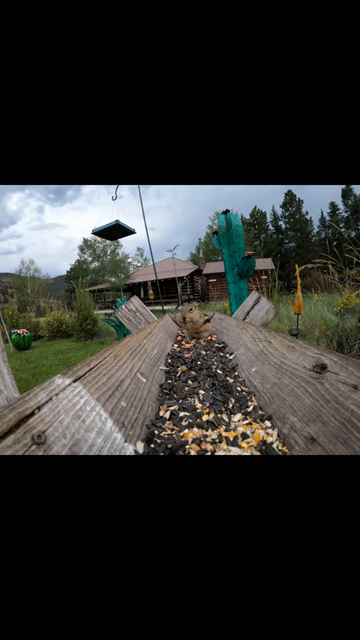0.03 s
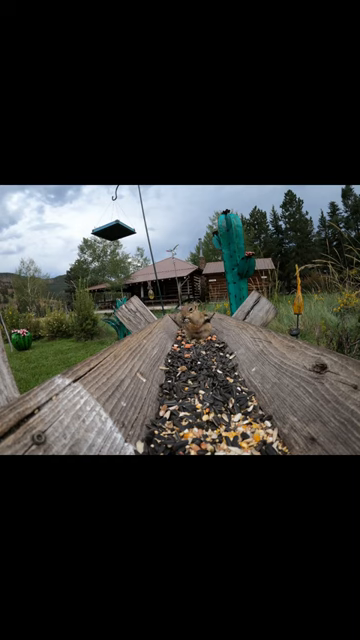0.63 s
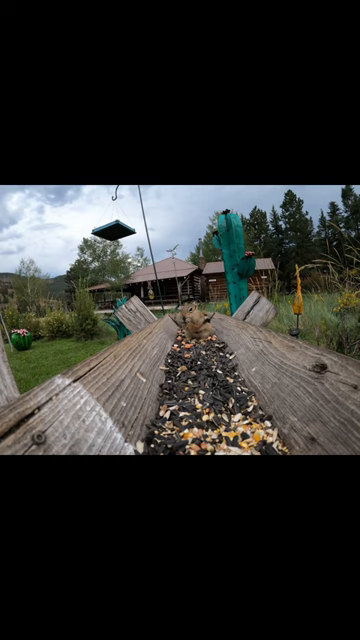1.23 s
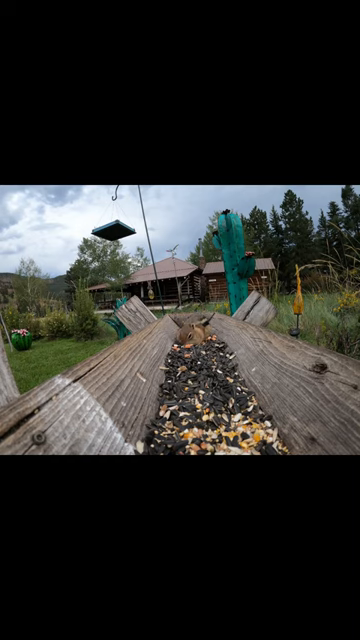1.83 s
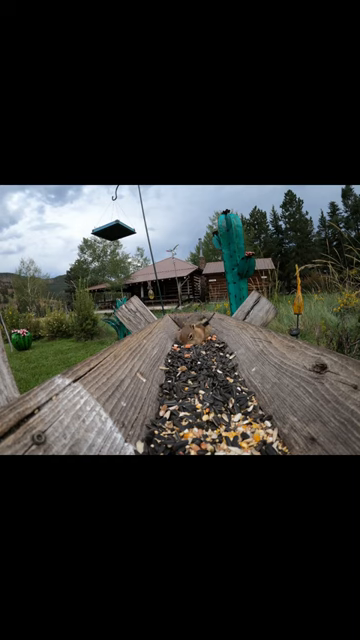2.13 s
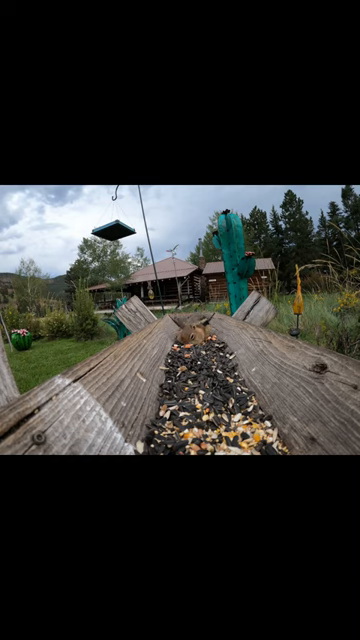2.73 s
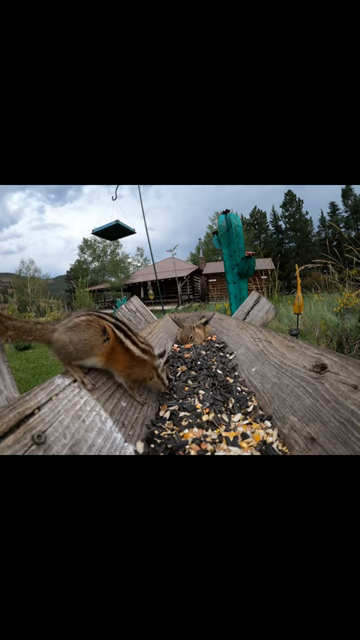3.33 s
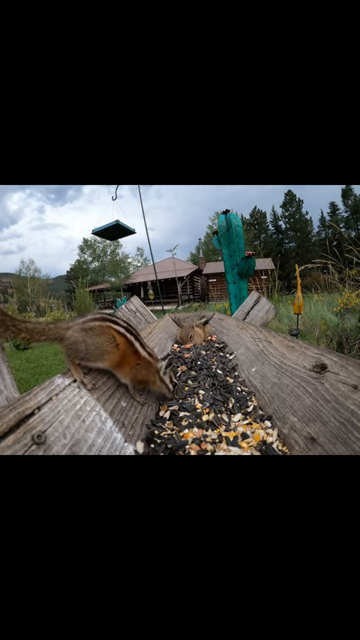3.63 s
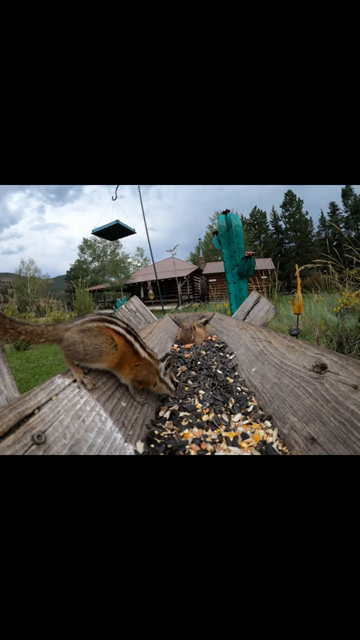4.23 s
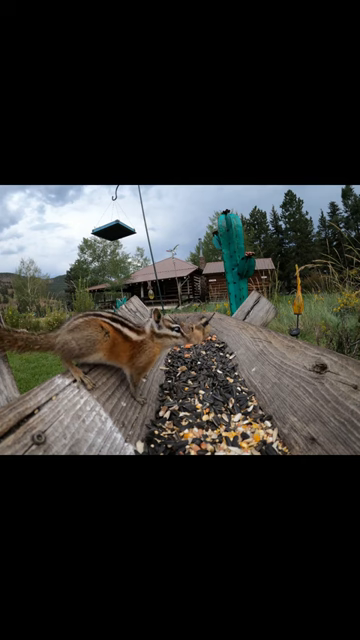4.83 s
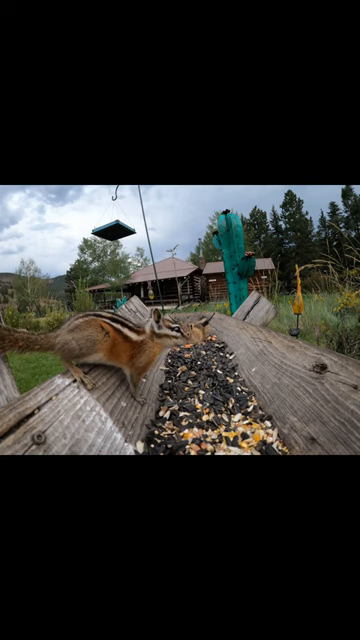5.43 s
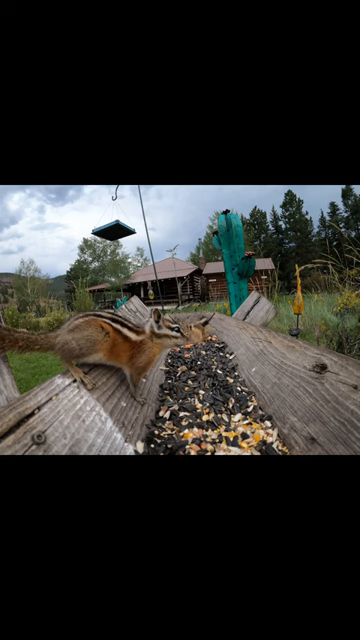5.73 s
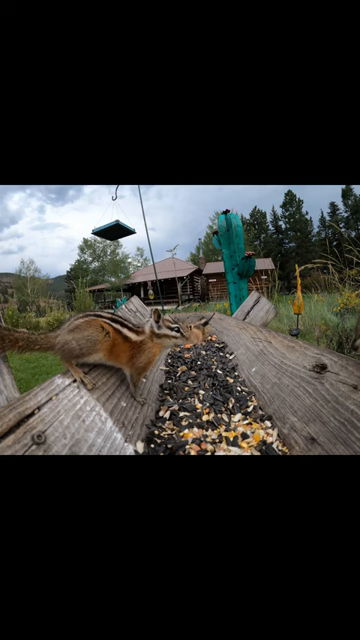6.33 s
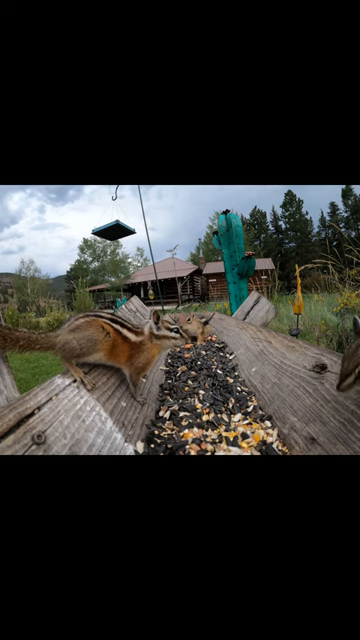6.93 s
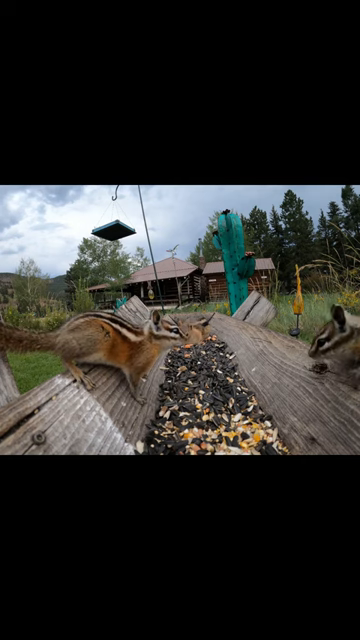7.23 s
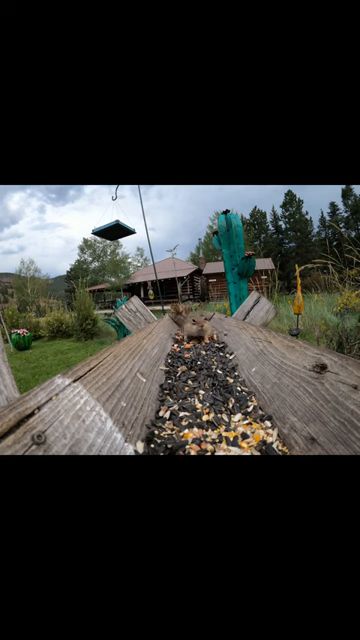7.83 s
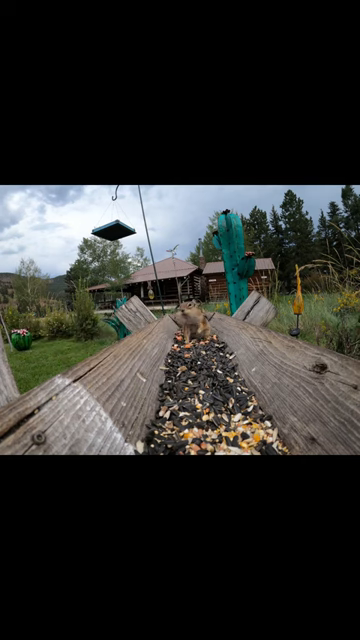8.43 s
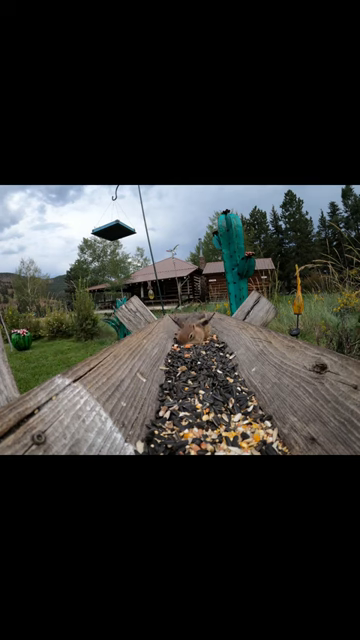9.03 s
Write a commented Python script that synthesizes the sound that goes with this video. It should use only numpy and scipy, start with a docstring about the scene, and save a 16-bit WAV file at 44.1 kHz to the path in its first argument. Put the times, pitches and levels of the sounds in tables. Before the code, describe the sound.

Chipmunks forage on a wooden feeder close to the microphone, over a faint outdoor rush and low wavering drone. Dry husks rustle and snap through the first two seconds while a distant bird trills. A nearby bird repeats a high two-part chirp about twice a second until around 7 seconds. At 0.7 seconds, and again from 2.6 to 3, claws and paws dash over the planks with hollow taps and soft thumps. Far whistles come between 2.4 and 4.5 seconds. From 3.5 seconds shells crack and tiny teeth click, with a few paw thumps just after 5, then soft chewing until 6.3. Short high chips answer the bird from 6.7. From 7.6 to 8.3 seconds comes the loudest part, a scuffle of clattering claws, knocks, low bumps and scattering seeds. A few chips and light taps finish it by 9 seconds.

```python
"""Chipmunks forage in a wooden trough of sunflower seeds, beside a camera resting on the boards.
From the start husks rustle and snap over a distant rush, a low drone and a far trill; a near bird
repeats a two-humped chirp. Before the first second is out, and again near the third, a dash sets the
planks ringing under claws and paws. Birds whistle further off, teeth crack shells, an animal chews,
and short chips answer the chirp. Near the end two chipmunks scuffle and bolt."""
import sys
import numpy as np
from scipy import signal
from scipy.fft import rfft, irfft
from scipy.io import wavfile
from scipy.ndimage import uniform_filter1d

SR = 44100
rng = np.random.default_rng(int(sys.argv[2]) if len(sys.argv) > 2 else 0)


def wav_out(sig):
    """Save sig, one row per channel (or a flat mono array), as 16-bit PCM at SR to the path in sys.argv[1]."""
    wavfile.write(sys.argv[1], SR, np.round(np.clip(np.atleast_2d(sig).T, -1, 1) * 32767).astype(np.int16))


N = 401310
TIME = np.arange(N) / SR

# Resonances of the feeder. Each row: frequency in Hz, bandwidth in Hz, gain in dB when struck at the
# far end, gain in dB when struck on the rim.
PLANK_MODES = [(710, 35, -9.5, 11), (775, 83, 6.5, -33), (941, 74, 12.5, -2.5), (989, 88, 9, 7),
               (1140, 120, 0.5, 6.5), (1302, 72, -2, 9.5), (1527, 39, -6, -19), (1566, 96, -42, 8.5),
               (2040, 13, -26, 12), (2750, 67, -23, -1), (3410, 126, -3, 3), (3650, 156, 0.5, -9),
               (4470, 160, -17.5, 0), (4800, 190, -13, -4.5), (6700, 99, -8, -23)]
# Low modes of the boards. Each row: frequency in Hz, 60 dB decay time in seconds, left minus right in dB.
BOARD_MODES = [(139.6, 0.15, -2), (195.5, 0.27, -3.5), (236.7, 0.15, -14), (334.1, 0.17, -30),
               (342.6, 0.23, -4)]
# Path of the busiest animal. Each row: time in seconds, place from 0 (far end) to 1 (near rim).
PLACE = [(0, 0.033), (3.0, 0.1), (3.4, 0.66), (7.5, 0.33), (7.86, 0.67), (7.95, 0.47), (9.1, 0.39)]
# Spectra of the noises. Each row: frequency in Hz, gain in dB.
SWAY_SPECTRUM = [(10, -7), (27, 5.5), (40, 0.5), (60, -1.5), (90, -11.5), (200, -40), (500, -81)]
RUSH_SPECTRUM = [(40, 10.5), (90, 7.5), (150, 8.5), (220, 4.5), (270, -3), (520, -9), (750, -6),
                 (1000, -1.5), (1300, 1), (2100, -12), (3000, -20.5), (4500, -26.5), (8000, -32.5),
                 (16000, -43)]
HUSK_SPECTRUM = [(800, -7), (1200, 10.5), (2000, 10.5), (3500, 0), (6000, 0), (8000, -9.5), (10000, -11.5),
                 (13000, -18), (16000, -25)]
CLAW_SPECTRUM = [(300, 6.5), (700, -3.5), (3000, -10), (7000, -12), (10000, -19.5), (13000, -16.5),
                 (16000, -30)]
BOARD_SPECTRUM = [(60, -19.5), (130, 11), (220, 17.5), (280, 8.5), (340, 13.5), (450, 5.5), (560, -7),
                  (700, -10), (850, -41)]
SEED_SPECTRUM = [(1200, -3.5), (1800, 1.5), (3500, 0), (6500, -3.5), (9000, -7), (12500, -14.5),
                 (14500, -17), (16000, -44.5)]
# A breeze rocking the feeder. Each row: time in seconds, level in dB.
BREEZE = [(0, -81), (1.3, -62.5), (1.8, -51.5), (2.2, -72), (3.1, -60.5), (4.5, -62), (5.4, -56),
          (6.2, -71.5), (9.1, -69)]
# A far drone. Each row: time in seconds, centre frequency in Hz, level in dB.
DRONE = [(0, 149.6, -70.5), (.9, 144.5, -62.5), (1.45, 195.2, -62.5), (1.65, 130.8, -59.5),
         (1.85, 87.45, -51), (2.17, 81.9, -55), (2.55, 98.3, -49), (3.25, 88, -53.5), (3.6, 71.4, -62),
         (4.4, 75.3, -50), (4.8, 86.1, -57.5), (5.1, 150, -56), (5.6, 145, -62), (6.2, 90.1, -74.5),
         (7.3, 108.6, -67.5), (9.1, 79.4, -72)]
# A distant rush with a hum in it. Each row: time in seconds, rush level in dB, hum level in dB.
RUSH = [(0, -61, -69), (2.1, -60, -64), (3.3, -62.5, -73), (4.5, -62, -71), (5.3, -61, -68),
        (6.1, -62, -63), (7.4, -60, -66.5), (8.5, -63.5, -69.5), (9.1, -60.5, -81.5)]
# Trill phrases. Each row: start, length and first note spacing in seconds, relative level in dB,
# pitch factor.
TRILLS = [(-.025, 1.26, .111, -59, 1.09), (1.487, .47, .134, -64, .99)]
# Contours of single bird notes. Each row: time from the onset in seconds, frequency in Hz, gain in dB.
TRILL_SHAPE = [(0, 2340, 9), (.015, 2650, 1), (.028, 3010, 10), (.04, 3960, -0.5), (.055, 4100, -54)]
CHIRP_SHAPE = [(0, 4100, -24), (.007, 4400, -14.5), (.016, 4490, -5.5), (.026, 4280, -7.5),
               (.034, 3900, -19), (.040, 4350, -14), (.05, 4500, -4), (.06, 4260, -4.5), (.068, 3850, -5.5),
               (.076, 3300, -8)]
CHIP_SHAPE = [(0, 3170, -17), (.008, 3470, -8.5), (.018, 4250, -9), (.028, 4330, -8), (.038, 3950, -17),
              (.046, 3820, 1)]
# Bouts of nosing among husks. Each row: start in seconds, length in seconds, relative level in dB.
RUMMAGES = [(0, 0.92, -86), (1.707, 0.17, -77.5), (2.24, 0.099, -84), (3.284, 0.026, -76),
            (3.433, 0.043, -70), (3.946, .08, -74), (4.18, 0.15, -81.5), (4.553, 0.096, -78.5),
            (5.09, 0.069, -75), (5.279, 0.031, -77), (5.72, 0.33, -114), (6.117, 0.061, -82),
            (6.428, 0.16, -77.5), (6.81, 0.04, -72), (7.145, 0.015, -72), (7.497, 0.026, -74.5),
            (8.252, 0.23, -91), (9.0, 0.02, -69.5)]
# Husks splitting. Each row: start and decay time in seconds, levels of the low band, the crack and the
# bright edge in dB, top of the edge in Hz.
SNAPS = [(0.0888, 0.00053, -74, -62, -61, 15000), (0.1162, 0.0014, -50.5, -50.5, -48, 12000),
         (.598, 0.00068, -53, -58, -48.5, 14800), (0.634, 0.00055, -62, -68, -53, 14000),
         (.858, 0.001, -74, -75, -55, 13700), (1.096, 0.00062, -72, -79, -60, 14840),
         (1.106, .002, -65, -75, -66, 10000), (1.1455, 0.0054, -57, -55, -50.5, 9000),
         (1.235, .002, -76, -67, -68, 12100), (1.302, .003, -77, -74, -65, 12900),
         (1.357, 0.00092, -72, -58, -69, 14140), (1.572, 0.0066, -65, -66, -60.5, 7940),
         (1.639, 0.00077, -70, -60, -57, 14000), (1.708, 0.0065, -70, -66, -54.5, 12000),
         (3.478, 0.0012, -66, -59.5, -64, 8000), (3.575, .0015, -57, -55, -68, 7000),
         (3.7753, 0.0012, -56, -56, -71, 5970), (3.8555, 0.00092, -57, -53, -59, 9000),
         (3.9473, 0.0046, -61, -64, -61, 9000), (3.9904, 0.0018, -49.5, -52, -51.5, 7950),
         (4.01, 0.0031, -65, -60, -71, 6000)]
# Two-humped chirps and arched chips. Each row: start in seconds, relative level in dB, pitch factor.
CHIRPS = [(0.300, -59.5, 1), (0.762, -56, 0.95), (1.3, -57.5, 0.98), (1.912, -58.5, 1), (2.405, -58, 1.02),
          (3, -54.5, 1), (3.672, -58, 0.99), (4.129, -59, 1.02), (4.6, -56, 1), (5.056, -59.5, 1),
          (5.515, -59, 0.98), (6.013, -58.5, 0.97), (6.803, -56, 0.96), (7.207, -55.5, 1.02)]
CHIPS = [(6.72, -65.5, 0.95), (7.062, -69, 1.04), (7.193, -59, 1), (8.215, -64, 0.99), (8.683, -59.5, 1.04),
         (8.786, -63, 0.96)]
# Claws and seeds striking wood. Each row: time and skid time scale in seconds, relative levels of plank
# ring, husk crack and claw tick in dB, left minus right in dB, pitches of the spot and the husk in Hz.
TAPS = [(0.6637, 0.0056, -44.5, -60, -53.5, -6, 850, 7500), (.675, 0.0018, -62, -56, -45, -2, 920, 5350),
        (.7125, 0.0042, -37.5, -56, -50, -4, 1000, 7200), (0.7192, 0.0016, -48, -53, -55, -3, 910, 7400),
        (0.7598, 0.0018, -46, -66, -48, 5.5, 860, 5540), (2.6165, 0.0018, -57, -55, -54.5, -2, 980, 6800),
        (2.6745, 0.0018, -52.5, -53, -53, 3, 870, 6000), (2.732, 0.0041, -52, -71, -65, -1, 860, 6190),
        (2.798, 0.0017, -59, -64, -54, 5, 820, 3280), (2.811, .0053, -51.5, -57, -54, 8.5, 830, 6200),
        (2.8425, 0.0017, -50, -59, -52, 1, 824, 6000), (2.881, 0.0018, -50, -66, -54, 3, 810, 5850),
        (2.898, 0.0018, -43, -54, -56, 1, 1033, 6340), (2.9264, 0.0017, -58, -56.5, -62, 8, 1010, 5900),
        (2.957, 0.0031, -37.5, -45.5, -50, 4.5, 807, 6270), (2.967, 0.0047, -51, -47, -45, 0, 910, 5800),
        (3.0444, 0.0026, -50.5, -56, -56, 2, 1040, 5750),
        (3.0783, 0.0068, -44, -60.5, -59.5, 3, 1055, 6100),
        (3.2975, 0.0021, -74, -70, -57.5, 2, 1000, 6220), (3.3722, 0.0015, -55.5, -84, -72, -4, 1310, 6000),
        (3.446, 0.0032, -63, -69, -58.5, 2, 1030, 5470), (3.495, 0.0023, -49.5, -69, -78, -1, 1330, 5000),
        (5.167, 0.0043, -52.5, -71, -78, -1, 1090, 6240), (6.4197, 0.0068, -79, -84, -73, 17, 1100, 8000),
        (6.444, 0.0068, -54, -77, -76, -2, 1110, 5000), (6.8666, .0037, -51, -55, -69, 3, 630, 4500),
        (7.141, 0.0087, -56, -64.5, -78, 1, 1020, 5000), (7.511, 0.002, -60.5, -53.5, -69, 0, 1110, 5240),
        (7.6046, 0.004, -44, -46, -48, -4.5, 1310, 5000), (7.61, 0.0034, -37.5, -44, -53, -1.5, 1317, 5000),
        (7.622, 0.005, -47, -39.5, -49, -2, 1350, 5030), (7.642, 0.0029, -30.5, -30, -31, 1.5, 1104, 6980),
        (7.653, 0.0019, -44, -39, -44, 4, 1120, 5000), (7.674, 0.002, -31.5, -39, -56, 1.5, 670, 5000),
        (7.683, 0.0034, -34.5, -42.5, -45, -1, 1030, 5070), (7.701, 0.003, -32, -33.5, -38, 0, 956, 4900),
        (7.717, 0.0062, -42, -42, -47, -1, 1020, 5000), (7.793, 0.0023, -30, -40.5, -45, -0.5, 1050, 6400),
        (7.811, 0.0042, -34, -46, -56, -2, 1010, 5000), (7.824, 0.002, -37, -53, -62, -4, 950, 5000),
        (7.847, 0.002, -26, -48, -51, -4, 653, 4950), (7.8597, 0.0011, -48, -41, -62, 9, 1310, 4700),
        (7.874, .001, -52, -42, -54, -4, 1100, 5200), (7.881, .001, -44, -45, -58, 3, 1100, 8600),
        (7.907, 0.0017, -45, -40, -47, -1, 1000, 7550), (7.915, 0.0028, -48, -36, -45.5, -2, 980, 4040),
        (7.944, 0.0014, -51, -47, -62, -1, 990, 4500), (7.9508, 0.0011, -45, -40, -64, 2, 1005, 5450),
        (7.969, .0012, -44, -51, -68, -1, 1035, 4300), (8.0027, 0.00184, -49, -49, -54, -1, 990, 4530),
        (8.036, .001, -57, -50.5, -68, 0, 990, 4460), (8.072, 0.001, -59, -49, -71, -2, 995, 4230),
        (8.0935, 0.0048, -42, -43, -52, 0, 1183, 4300), (8.114, 0.0021, -41.5, -50.5, -70, -3, 965, 4500),
        (8.165, 0.0024, -46.5, -41.5, -53.5, -2, 1010, 4280),
        (8.268, 0.0016, -50, -64.5, -78, 0, 1050, 4500), (8.984, .0012, -60, -73, -62, -2, 970, 5500),
        (9.061, 0.0026, -56.5, -75, -72, -3, 1028, 5700)]
# Paws landing. Each row: start in seconds, peak level in dB, pitch of the spot in Hz.
PAWS = [(.686, -46, 360), (0.754, -47.5, 169), (.765, -45.5, 356), (1.581, -54, 235), (1.656, -52.5, 188),
        (1.709, -51, 233), (2.612, -45, 141), (2.654, -49.5, 342.7), (2.817, -40.5, 360),
        (2.957, -32, 263.5), (3.362, -51.5, 255), (3.445, -55, 374), (5.105, -45, 167), (5.123, -40, 239),
        (5.139, -42, 147), (5.176, -43, 245), (5.316, -47, 155), (6.874, -44, 217), (7.605, -40, 153),
        (7.655, -42, 208), (7.673, -29.5, 270), (7.827, -36, 223), (7.859, -32.5, 139), (7.903, -29.5, 322),
        (7.946, -37, 340), (7.973, -31.5, 320), (8.015, -44, 335), (8.056, -33.5, 330), (8.109, -34.5, 326),
        (8.158, -41.5, 320), (8.267, -38.5, 193), (8.2843, -39, 196)]
# Dashes through the trough. Each row: start and length in seconds, levels of scraping, scattered seed
# and board rumble in dB, fade in dB per second (negative grows).
DASHES = [(0.686, 0.12, -57.5, -61, -47.5, 58), (2.636, 0.38, -62, -65.5, -52.5, -7.5),
          (7.611, 0.11, -54.5, -49.5, -40, -18), (7.738, 0.21, -55, -55.5, -56.5, -7),
          (7.843, 0.26, -45.5, -50.5, -39, 42), (8.147, 0.31, -62, -62, -52, 61)]
# Claws dragging. Each row: start and length in seconds, plank and husk levels in dB, husk pitch in Hz.
SCRAPES = [(0.688, 0.03, -38, -47.5, 7500), (2.655, 0.012, -54, -55, 3670), (2.765, 0.028, -58, -55, 3400),
           (2.806, 0.016, -58, -54, 3470), (2.838, 0.013, -64, -48, 3350), (2.861, 0.018, -67, -54, 3230),
           (5.091, 0.025, -49, -54, 1580), (7.557, 0.0074, -63, -54.5, 5240),
           (7.602, 0.038, -48, -59, 3250), (7.675, 0.017, -42, -48, 3900), (7.819, 0.014, -40, -54, 3940),
           (7.95, 0.03, -56, -47, 3680), (8.048, 0.047, -54, -56, 3700), (9.001, 0.016, -55.5, -71, 3050)]
# Clean knocks. Each row: start in seconds, level in dB, pitch in Hz, relative after-ring level in dB.
KNOCKS = [(0.6911, -37.5, 900, -13), (2.068, -43.5, 1174, -5), (2.332, -49, 1140, -15),
          (4.1421, -50.5, 1372, -5), (5.2602, -44, 1260, -8), (7.8452, -23, 1002, -3)]
# Low bumps from wind gusts and leaps rocking the feeder. Each row: start in seconds, relative level
# in dB, pitch in Hz, left minus right in dB.
BUMPS = [(0.751, -45, 115, 18), (2.665, -32, 46.3, 16.5), (2.953, -32.5, 101, 21), (4.373, -41.5, 75.6, 1),
         (4.565, -38, 62, 1), (5.355, -42.5, 71.6, 0), (5.649, -46.5, 32, 0), (5.853, -45, 54.2, 0),
         (6.267, -50.5, 66, 1), (7.651, -26.5, 38.7, 2), (7.946, -35, 34, 10)]
# Slurred whistles. Each row: start and length in seconds, level in dB, first, middle and last pitch
# in Hz, waver as a share of the pitch.
WHISTLES = [(2.413, .15, -57.5, 1530, 1896, 1710, 0.016), (2.582, 0.12, -61.5, 1510, 1730, 1710, 0.041),
            (3.49, 0.14, -67, 1700, 2030, 2230, 0.031), (3.493, 0.097, -71, 2670, 2970, 3160, .025),
            (3.636, .09, -68, 1690, 1904, 2020, 0.046), (4.34, 0.17, -71, 2309, 2550, 2560, 0.048)]
# Teeth clicking on a seed. Each row: start in seconds, level in dB, pitch of the shell in Hz.
NIBBLES = [(4.176, -62, 4640), (4.24, -69, 5230), (4.249, -61, 5160), (4.308, -71, 4960),
           (4.374, -65.5, 5800), (4.409, -72, 5250), (4.45, -70, 5300), (4.5, -65.5, 6260),
           (4.543, -67, 4830), (4.559, -62, 5500), (4.592, -67, 8700), (4.64, -69, 5440),
           (5.136, -62, 6300), (5.145, -62, 6260), (5.157, -69, 6100), (5.218, -76, 6090),
           (5.273, -82, 6040), (5.306, -70, 6150), (5.458, -58.5, 6200), (5.472, -78, 6060),
           (5.496, -73, 6020)]


def undb(db):
    """Decibels to amplitude ratio."""
    return 10 ** (np.asarray(db) / 20)


def unit(x):
    """Normalisation to rms 1."""
    return x / np.sqrt(np.mean(x ** 2) + 1e-30)


def crest(x, size=132):
    """Normalisation of the loudest few milliseconds to rms 1."""
    return x / np.sqrt(uniform_filter1d(np.mean(x ** 2, axis=0), size).max() + 1e-30)


def noise(size=N):
    """White noise in two uncorrelated channels."""
    return rng.standard_normal((2, size))


def curve(rows, column=1):
    """Gain interpolated from a dB column of a table, silent outside its span."""
    rows = np.array(rows)
    return undb(np.interp(TIME, rows[:, 0], rows[:, column], left=-140, right=-140))


def colour(x, spectrum):
    """Spectral shaping by (Hz, dB) points."""
    hz, db = np.transpose(spectrum)
    f = np.fft.rfftfreq(x.shape[-1], 1 / SR) + 1
    return irfft(rfft(x) * undb(np.interp(np.log(f), np.log(hz), db)), x.shape[-1])


def band(x, lo, hi):
    """Causal band-pass filtering."""
    return signal.sosfilt(signal.butter(3, [lo, min(hi, .45 * SR)], "band", fs=SR, output="sos"), x)


def narrow(hz, width_hz):
    """Modulation shifts slow noise to a narrow band about a centre that may move."""
    slow = signal.sosfilt(signal.butter(2, width_hz / 2, fs=SR, output="sos"), noise() + 1j * noise())
    return unit(np.real(slow * np.exp(2j * np.pi * np.cumsum(hz + np.zeros(N)) / SR)))


def pan(db):
    """Left and right gains for a level difference."""
    return undb([[db / 2], [-db / 2]])


def spread(pair, side_db, pan_db=0):
    """Sum and difference turn mid and side signals into left and right."""
    side = undb(side_db) * pair[1]
    return np.array([pair[0] + side, pair[0] - side]) * pan(pan_db)


def walk(rate):
    """Slow fluctuation: random values held 1 / rate seconds and smoothed twice."""
    k = int(SR / rate)
    steps = np.repeat(rng.standard_normal(N // k + 1), k)
    return uniform_filter1d(uniform_filter1d(steps, k), k)[:N]


def bout(start, length, rise_db_s=288, fall_db_s=200.5):
    """Envelope of a burst of activity: exponential rise, hold, exponential decay."""
    before, after = np.maximum(start - TIME, 0), np.maximum(TIME - start - length, 0)
    return undb(-rise_db_s * before - fall_db_s * after)


def add(out, start, x):
    """Superposition of a short sound at a start in seconds."""
    i = int(start * SR)
    a, b = max(i, 0), min(i + x.shape[-1], N)
    out[..., a:b] += x[..., a - i:b - i]


def decay(t60, size):
    """Exponential damping by 60 dB in t60 seconds."""
    return np.exp(-np.log(1000) * np.arange(size) / SR / t60)


def ring(hz, t60, size=8192):
    """Free vibration of one damped mode."""
    return np.sin(2 * np.pi * hz * np.arange(size) / SR) * decay(t60, size)


def resonate(force, response):
    """Convolution of a two-channel force with an impulse response."""
    return signal.fftconvolve(force, response[None], axes=1)[:, :force.shape[1]]


def place_at(seconds):
    """The animal's place between the far end (0) and the rim (1)."""
    return np.interp(seconds, *np.transpose(PLACE))


def trough(force, place, direct_db):
    """Modal superposition: the point of contact weights each plank mode; some sound arrives directly."""
    response = 0
    for k, (hz, width, far_db, rim_db) in enumerate(PLANK_MODES):
        gain = (-1) ** k * undb(far_db + place * (rim_db - far_db)) * 2 * np.pi * width / SR
        response += gain * ring(hz, t60=np.log(1000) / np.pi / width, size=4096)
    return resonate(force, response) + undb(direct_db) * force


def grains(rate, scatter_db, t60):
    """Shot noise: tiny random collisions of uneven strength, whose decaying powers add."""
    hits = (rng.random(N) < rate / SR) * undb(scatter_db * np.minimum(rng.exponential(size=N), 4))
    power = signal.fftconvolve(hits ** 2, decay(t60, 1024) ** 2)[:N]
    return unit(np.sqrt(np.abs(power)) * noise())


def rough_noise(size, grit_db=4, hold=16):
    """Stick and slip: noise whose level jumps every few samples as a contact catches and lets go."""
    return undb(grit_db * np.repeat(rng.standard_normal(size // hold), hold)) * noise(size)


def note(shape, pitch, waver):
    """Frequency modulation: a whistled tone follows its contour a little unsteadily."""
    times, hz, db = np.transpose(shape)
    t = np.arange(int(times[-1] * SR)) / SR
    wobble = 1 + waver * unit(uniform_filter1d(rng.standard_normal(len(t)), size=60))
    glide = uniform_filter1d(np.interp(t, times, hz), size=220) * pitch * wobble
    envelope = undb(np.interp(t, times, db)) * signal.windows.tukey(len(t), .15)
    return np.sin(2 * np.pi * np.cumsum(glide) / SR) * envelope


def trees(call, wet_db, t60, echo_db, count=5, size=26000):
    """Reflection from trunks and cabin walls adds a few quick echoes and a thin tail."""
    onset = 1 - np.exp(-np.arange(size) / SR / 0.00031)
    response = unit(noise(size) * decay(t60, size) * onset) * undb(wet_db) / np.sqrt(size)
    delays = (SR * rng.uniform(.003, .025, count)).astype(int)
    response[:, delays] += undb(echo_db) / np.sqrt(count)
    return call + signal.fftconvolve(call[None], response, axes=1)[:, :N]


def breeze(gust_db=5):
    """Forced vibration: small gusts rock the feeder at very low frequencies."""
    sway = unit(spread(colour(noise(), SWAY_SPECTRUM), side_db=-5, pan_db=2))
    return sway * curve(BREEZE) * undb(gust_db * walk(8.9))


def valley(waver_db=2, hiss_db=-95):
    """Narrow-band noise is heard as pitch: a far drone and hum waver in a broad rush and faint hiss."""
    drone_hz = np.interp(TIME, *np.transpose(DRONE)[:2])
    drone = unit(spread(narrow(drone_hz, width_hz=52), side_db=-32.5))
    drone *= curve(DRONE, column=2) * undb(waver_db * walk(6.5))
    rush = unit(spread(colour(noise(), RUSH_SPECTRUM), side_db=-4)) * curve(RUSH) * undb(walk(13))
    hum_hz = 1054 * (1 + .05 * walk(4))
    hum = unit(spread(narrow(hum_hz, width_hz=166), side_db=-27))
    hum *= curve(RUSH, column=2) * undb(waver_db * walk(6))
    return drone + rush + hum + unit(band(noise(), 2500, 17000)) * undb(hiss_db)


def far_trill(gain_db=-14, fade_db_s=6, sag_oct_s=0.105, slowing=1.017):
    """Beating between two close tones makes a bird's trill hoarse; each phrase slows, fades and sinks."""
    out = np.zeros(N)
    for start, length, gap, db, pitch in TRILLS:
        age = 0
        while age < length:
            for voice in (.94, 1.05):
                tone = note(TRILL_SHAPE, pitch * voice * 2 ** (-sag_oct_s * age), waver=0.055)
                add(out, start + age, undb(db + gain_db - fade_db_s * age) * tone)
            age, gap = age + gap, gap * slowing
    return trees(out, wet_db=4, t60=0.34, echo_db=-7)


def foraging(husk_db=3, gnaw_db=-1, fidget_db=2, idle_db=-85):
    """Many small collisions merge into a rustle as a nose shifts husks; teeth or claws catch the wood."""
    husks = colour(grains(rate=320, scatter_db=2.5, t60=0.038), HUSK_SPECTRUM)
    husks = unit(spread(husks, side_db=-1.5)) * undb(husk_db)
    gnaw = trough(grains(rate=140, scatter_db=2, t60=0.012), place=0, direct_db=-7)
    gnaw = unit(spread(band(gnaw, 750, 3010), side_db=-17)) * undb(gnaw_db)
    effort = undb(idle_db) + sum(undb(db) * bout(start, length) for start, length, db in RUMMAGES)
    return (husks + gnaw) * effort * undb(fidget_db * walk(25))


def husk_snaps(settle_db=-30, settle_s=0.036, size=4096):
    """Brittle fracture: a dry husk splits in one ragged, broadband click, and its pieces settle."""
    out, t = np.zeros((2, N)), np.arange(size) / SR
    for start, decay_s, low_db, crack_db, edge_db, top_hz in SNAPS:
        force = rough_noise(size) * (np.exp(-t / decay_s) + undb(settle_db) * np.exp(-t / settle_s))
        low = crest(spread(band(force, 750, 1760), side_db=-15)) * undb(low_db)
        crack = crest(spread(band(force, 1680, 2930), side_db=-24)) * undb(crack_db)
        edge = colour(force, [(2500, -30), (4400, 0), (top_hz, 0), (16000, -12)])
        add(out, start, low + crack + crest(spread(edge, side_db=-7)) * undb(edge_db))
    return out


def near_birds(chirp_db=-2.5):
    """Gliding pure tones: a bird chirps about twice a second, and late on arched chips answer."""
    out = np.zeros(N)
    for start, db, pitch in CHIRPS:
        add(out, start, undb(db + chirp_db) * note(CHIRP_SHAPE, pitch, waver=0.0089))
    for start, db, pitch in CHIPS:
        add(out, start, undb(db) * note(CHIP_SHAPE, pitch, waver=0.012))
    return trees(out, wet_db=-11.5, t60=0.72, echo_db=-4)


def claw_force(skid_s, settle_db=-29, bounce_db=-13, size=5120):
    """Impact, then friction: a claw strikes, skids over the grain and rebounds while seeds settle."""
    t = np.arange(size) / SR
    slip = np.exp(-(t / (1.9 * skid_s)) ** 2) + undb(settle_db) * decay(0.45, size)
    slip *= 1 - np.exp(-t / (0.34 * skid_s + 1e-5))  # a brief fade-in softens the start of each tap
    bounce = undb(bounce_db) * np.exp(-((t - rng.uniform(0.001, 0.0106)) / 0.00059) ** 2)
    force = rough_noise(size) * (slip + bounce)
    force[0, 8] += 0.87 * np.sqrt(skid_s * SR)  # the first contact is one sharp push
    return colour(force, CLAW_SPECTRUM) * (t < .9 * t[-1])


def claw_taps(lead_s=.0005, glancing_s=.0017):
    """Impulsive excitation: each tap rings the planks, the hollow note of its spot and a husk."""
    out = np.zeros((2, N))
    for time, skid_s, wood_db, crack_db, tick_db, pan_db, spot_hz, husk_hz in TAPS:
        force = claw_force(skid_s)
        light = skid_s < glancing_s  # a glancing claw barely stirs the planks: dry, thin and bright
        plank = trough(force, place_at(time), direct_db=-1 if light else -13)
        spot = resonate(band(force, 526, 2960), ring(spot_hz, t60=0.048, size=2048))
        husk = resonate(band(force, 3300, 12000), ring(husk_hz, t60=.011, size=1024))
        edge = band(np.diff(plank, prepend=0), 2200, 24000) if light else band(plank, 4220, 10650)
        wood = crest(band(plank, 900 if light else 600, 1530)) + undb(-1) * crest(spot)
        tick = crest(edge) + undb(-14 if light else -5) * crest(husk)
        low = crest(spread(wood, side_db=-7.5)) * undb(wood_db)
        mid = crest(spread(band(plank, 1830, 4520), side_db=-7.5)) * undb(crack_db)
        top = crest(spread(tick, side_db=-1.5)) * undb(tick_db + 1)
        add(out, time - lead_s, (low + mid + top) * pan(pan_db))
    return out


def paw_thumps(push_s=0.00049, reach_oct=0.25, thud_db=-8, size=8192):
    """A soft impact excites low modes: a paw stirs those nearest the pitch of the spot where it lands."""
    out, t = np.zeros((2, N)), np.arange(size) / SR
    for start, db, spot_hz in PAWS:
        board = sum(np.exp(-(np.log2(hz / spot_hz) / reach_oct) ** 2) * ring(hz, t60) * pan(pan_db)
                    for hz, t60, pan_db in BOARD_MODES)
        board *= 1 - np.exp(-t / push_s)
        thud = colour(noise(size), BOARD_SPECTRUM) * t * np.exp(-t / 0.0055)
        add(out, start, crest(crest(board) + undb(thud_db) * crest(thud)) * undb(db))
    return out


def running(stumble_db=4.5, sway_db=-5, rise_db_s=558):
    """Random forcing: scrabbling feet rub the wood, scatter seed, shake the boards and sway the feeder."""
    rim = place_at(TIME)
    scrape, seed, out = 0, 0, 0
    for place, share in ((0, 1 - rim), (1, rim)):
        claws = trough(grains(rate=380, scatter_db=1, t60=0.014), place, direct_db=-7)
        spill = trough(grains(rate=2000, scatter_db=7.5, t60=0.047), place, direct_db=-9)
        scrape += np.sqrt(share) * unit(spread(band(claws, 520, 2640), side_db=-6))
        seed += np.sqrt(share) * unit(spread(colour(spill, SEED_SPECTRUM), side_db=-1.5))
    rumble = unit(spread(colour(noise(), BOARD_SPECTRUM), side_db=-1.5, pan_db=-4.5))
    sway = unit(spread(colour(noise(), SWAY_SPECTRUM), side_db=-15, pan_db=1.5))
    for start, length, scrape_db, seed_db, rumble_db, fade_db_s in DASHES:
        effort = bout(start, length, rise_db_s, fall_db_s=260)
        effort *= undb(-fade_db_s * np.clip(TIME - start, 0, length))
        effort *= undb(stumble_db * walk(45))  # the feet push unevenly
        out += effort * (scrape * undb(scrape_db) + seed * undb(seed_db) + rumble * undb(rumble_db))
        out += sway * bout(start, length, rise_db_s, fall_db_s=90) * undb(rumble_db + sway_db)
    return out


def claw_scrapes(release_s=0.0039, rasp_db=-2, size=4096):
    """Friction drives resonance: under a dragging claw the plank rasps and a caught shell sings."""
    out, t = np.zeros((2, N)), np.arange(size) / SR
    for start, length, wood_db, husk_db, hz in SCRAPES:
        force = rough_noise(size, grit_db=6, hold=64) * np.exp(-np.maximum(t - length, 0) / release_s)
        plank = band(trough(force, place_at(start), direct_db=-12), 636, 2430)
        squeal = resonate(force, ring(hz, t60=.02))
        husks = crest(squeal) + undb(rasp_db) * crest(colour(force, SEED_SPECTRUM))
        add(out, start, crest(spread(plank, side_db=-27)) * undb(wood_db))
        add(out, start, crest(spread(husks, side_db=0)) * undb(husk_db))
    return out


def knocks(blow_t60=.007, ring_t60=0.026, overtone=1.91, overtone_db=-9, size=4096):
    """Damped bending: one hard push flexes the plank for a few cycles; a weaker hollow note rings on."""
    out = np.zeros((2, N))
    for start, db, hz, after_db in KNOCKS:
        blow = ring(hz, blow_t60, size) + undb(overtone_db) * ring(overtone * hz, blow_t60, size)
        after_ring = undb(after_db) * ring(hz, ring_t60, size)
        add(out, start, crest(band(blow + after_ring, 635, 3500)[None]) * undb(db))
    return out


def low_bumps(gain_db=-1, t60=0.062, push_s=0.011, size=8192):
    """Damped oscillation: wind gusts and leaps rock the feeder in low bumps."""
    out, t = np.zeros((2, N)), np.arange(size) / SR
    for start, db, hz, pan_db in BUMPS:
        rocking = ring(hz, t60, size) * (1 - np.exp(-t / push_s))
        add(out, start, crest(rocking[None]) * undb(db + gain_db) * pan(pan_db))
    return out


def whistles(taper_db=8):
    """Frequency glides: birds in the trees slur each note along a parabola, loudest at its middle."""
    out = np.zeros(N)
    for start, length, db, first_hz, middle_hz, last_hz, waver in WHISTLES:
        t = np.linspace(0, length, 9)
        arch = np.polyval(np.polyfit([0, length / 2, length], [first_hz, middle_hz, last_hz], 2), t)
        swell_db = -taper_db * (2 * t / length - 1) ** 2
        add(out, start, undb(db) * note(np.transpose([t, arch, swell_db]), 1, waver))
    return trees(out, wet_db=-4, t60=0.29, echo_db=-5)


def nibbling(crack_t60=0.0079, shell_t60=.008, crack_db=1, size=2048):
    """Fracture excites resonance: each bite is a short snap that rings the shell."""
    out = np.zeros((2, N))
    for start, db, hz in NIBBLES:
        crack = band(noise(size) * decay(crack_t60, size), 4500, 8100)
        shell = resonate(crack, ring(hz, shell_t60, size))
        bite = crest(shell) + undb(crack_db) * crest(crack)
        add(out, start, crest(spread(bite, side_db=1)) * undb(db))
    return out


def chewing(start=5.5, length=0.81, level_db=-70):
    """Band-limited shot noise: a chipmunk on the rim chews with small, dull crackles."""
    crackle = band(grains(rate=70, scatter_db=2, t60=0.019), 950, 2040)
    return unit(spread(crackle, side_db=2.5)) * bout(start, length) * undb(level_db)


def scene():
    """Superposition of everything on and around the feeder."""
    contacts = claw_taps() + knocks() + husk_snaps() + claw_scrapes() + paw_thumps()
    feeder = contacts + low_bumps() + running() + foraging() + nibbling() + chewing()
    return feeder + far_trill() + near_birds() + whistles() + breeze() + valley()


def record(dry, soften_hz=13000, top_hz=15900):
    """Delay and low-pass filtering: sound reaches the left port late, and the camera cuts the top."""
    ports = np.array([np.pad(dry[0], (2, 0))[:N], dry[1]])
    soft = signal.sosfilt(signal.butter(2, soften_hz, fs=SR, output="sos"), ports)
    return signal.sosfilt(signal.ellip(8, .2, 70, top_hz, fs=SR, output="sos"), soft)


dry = scene()
out = record(dry)
wav_out(out)
```